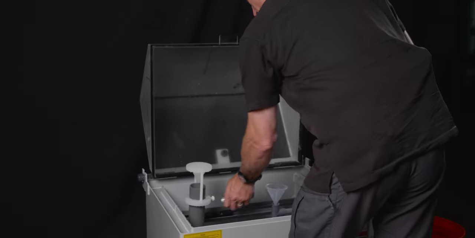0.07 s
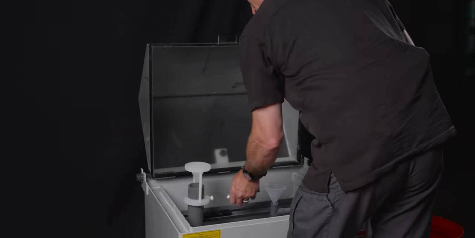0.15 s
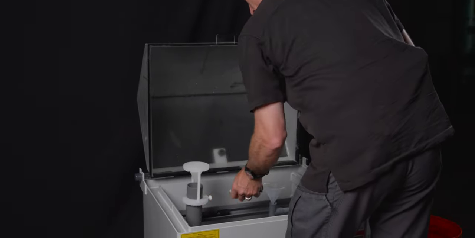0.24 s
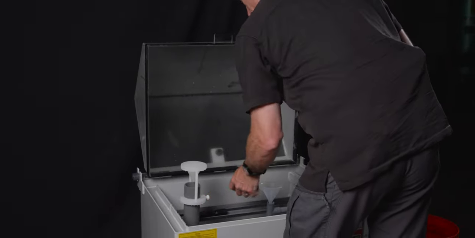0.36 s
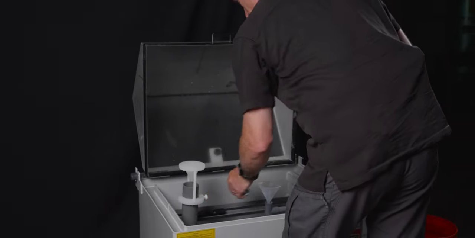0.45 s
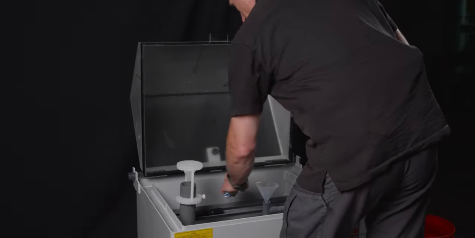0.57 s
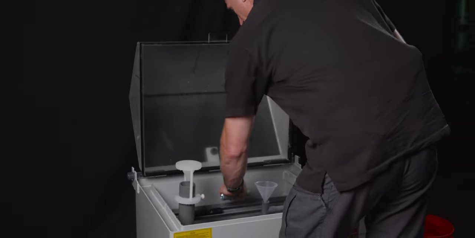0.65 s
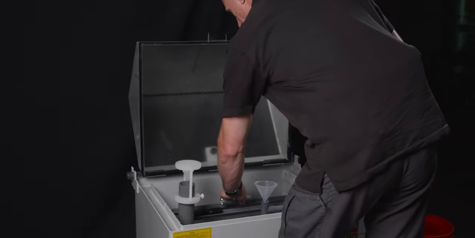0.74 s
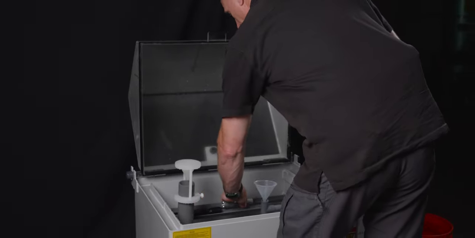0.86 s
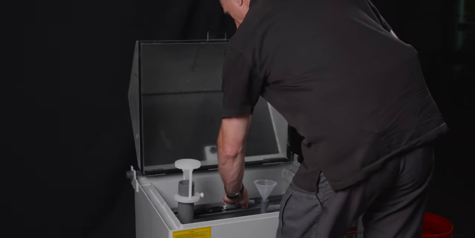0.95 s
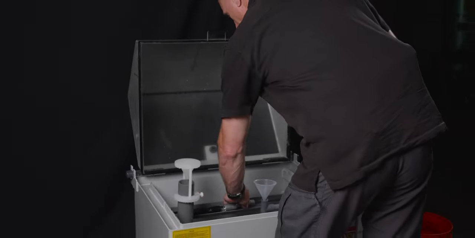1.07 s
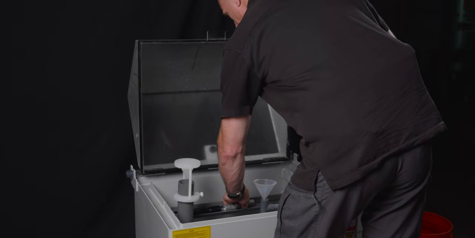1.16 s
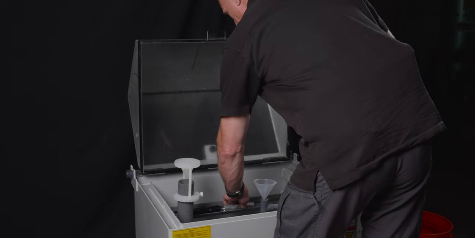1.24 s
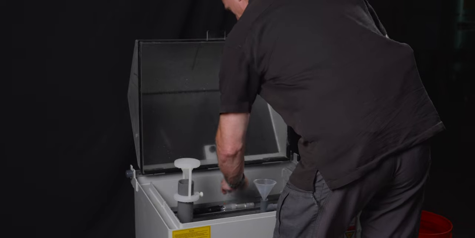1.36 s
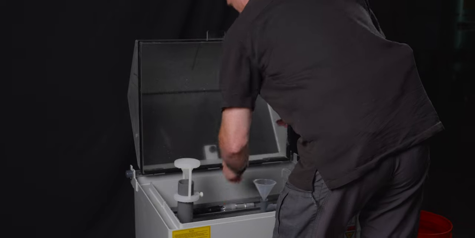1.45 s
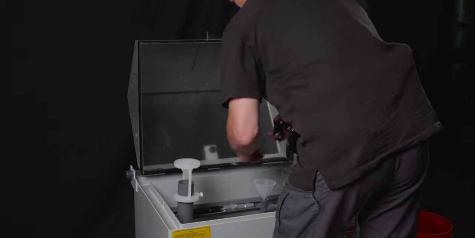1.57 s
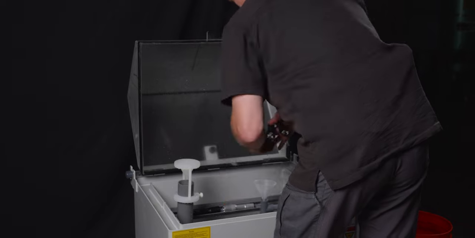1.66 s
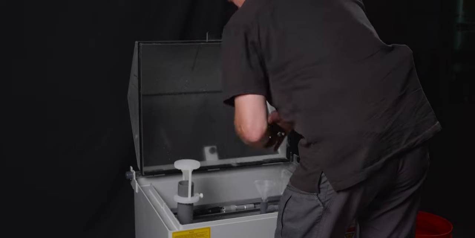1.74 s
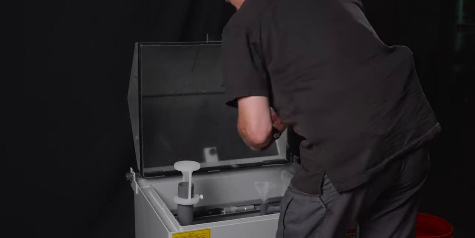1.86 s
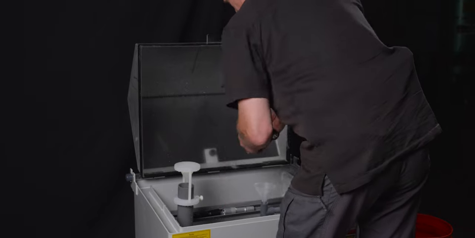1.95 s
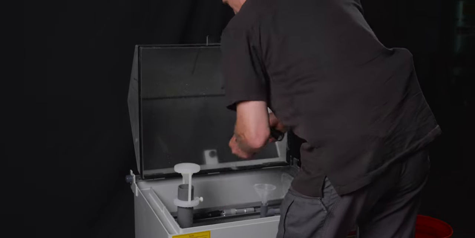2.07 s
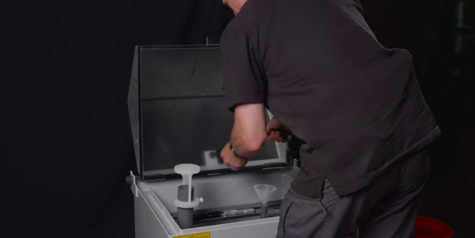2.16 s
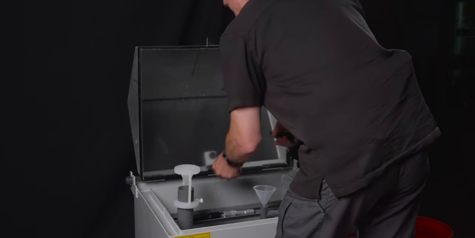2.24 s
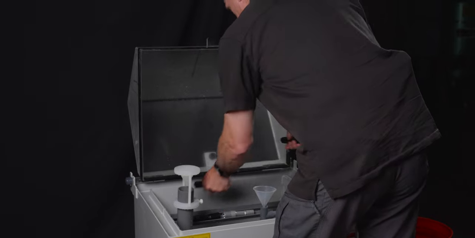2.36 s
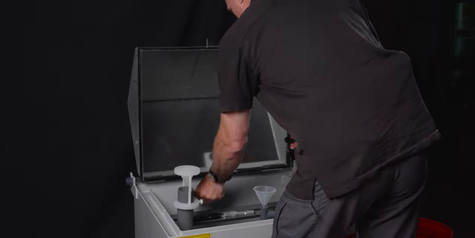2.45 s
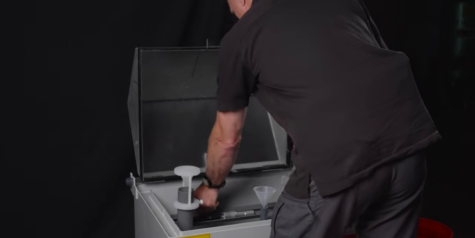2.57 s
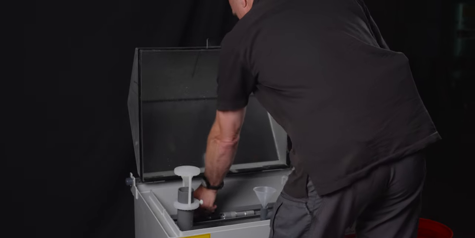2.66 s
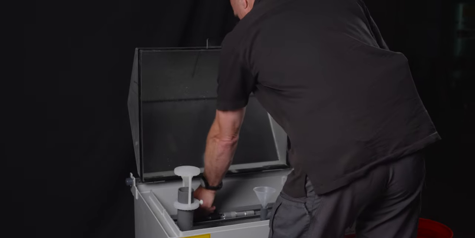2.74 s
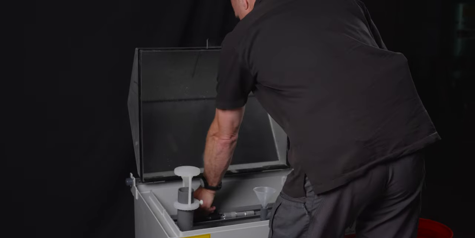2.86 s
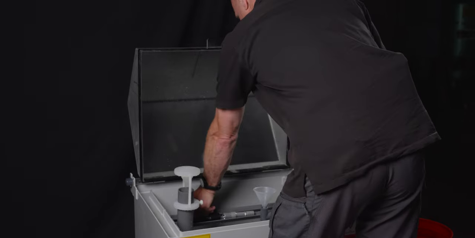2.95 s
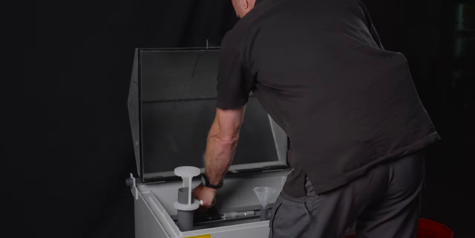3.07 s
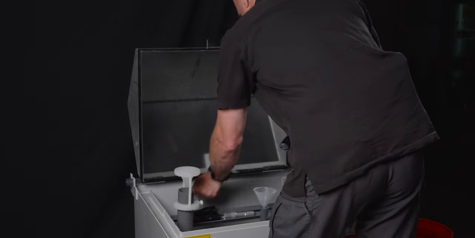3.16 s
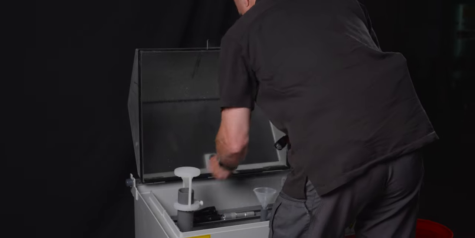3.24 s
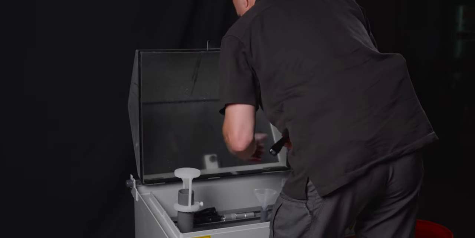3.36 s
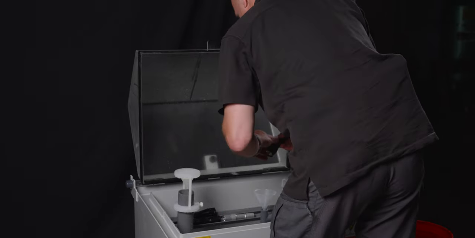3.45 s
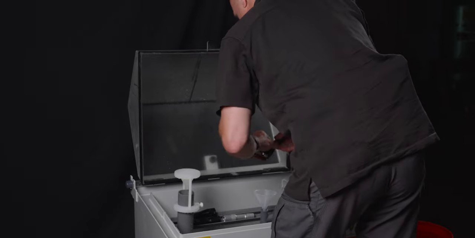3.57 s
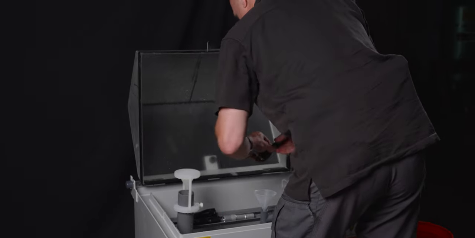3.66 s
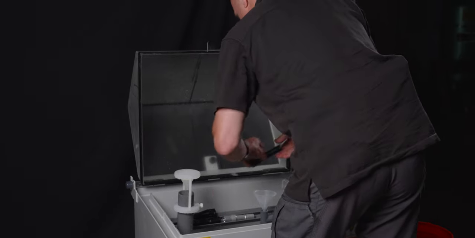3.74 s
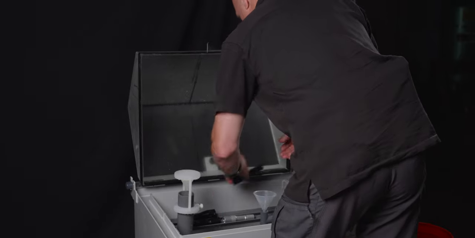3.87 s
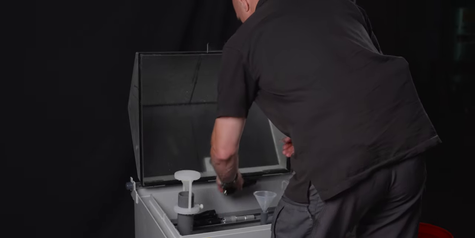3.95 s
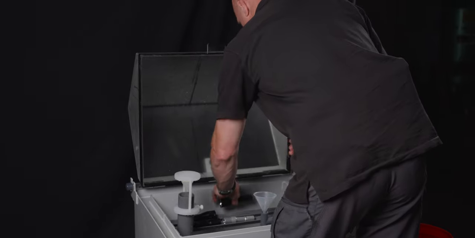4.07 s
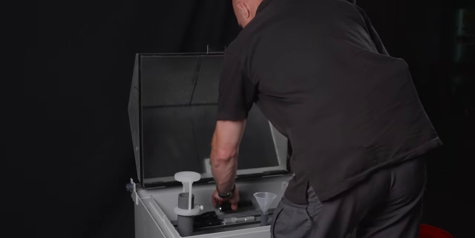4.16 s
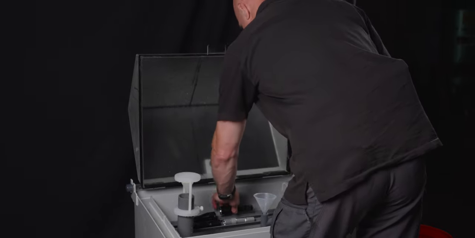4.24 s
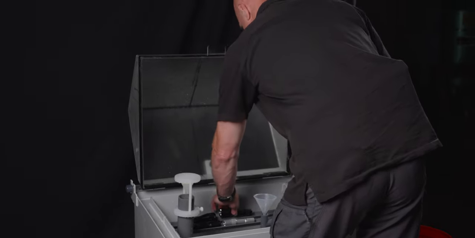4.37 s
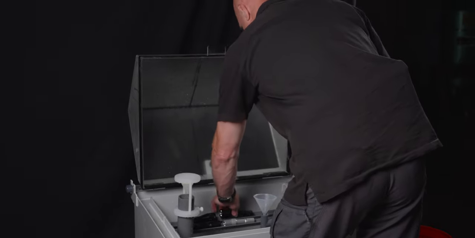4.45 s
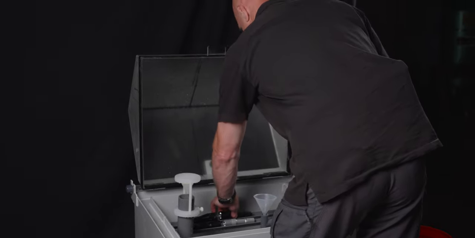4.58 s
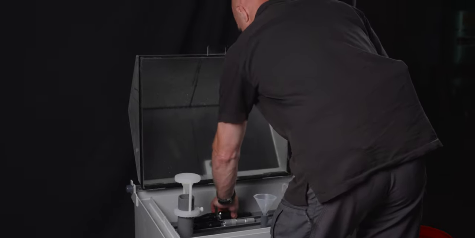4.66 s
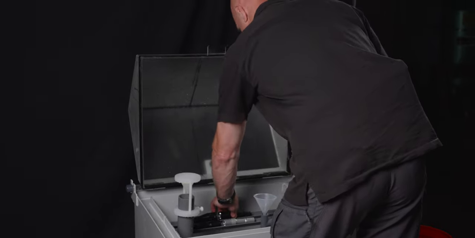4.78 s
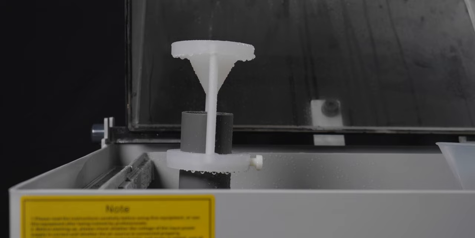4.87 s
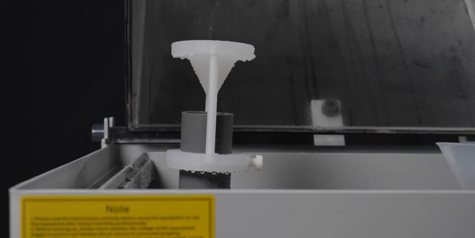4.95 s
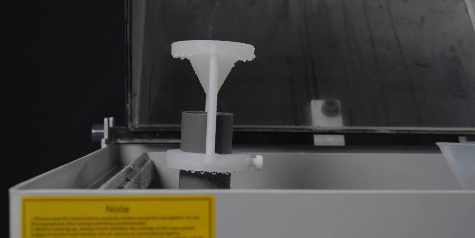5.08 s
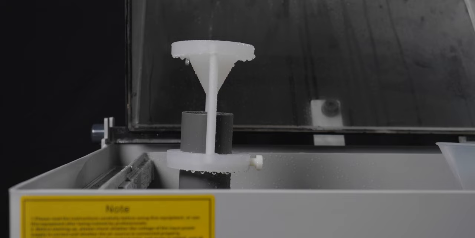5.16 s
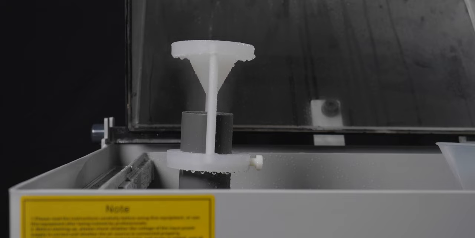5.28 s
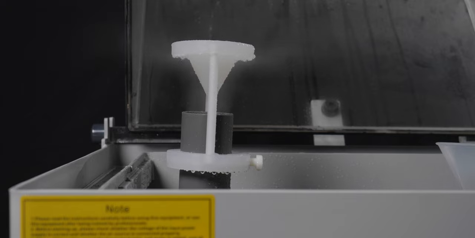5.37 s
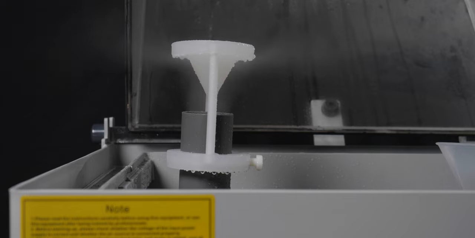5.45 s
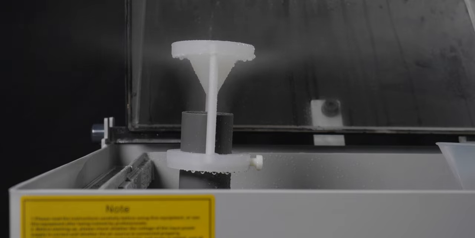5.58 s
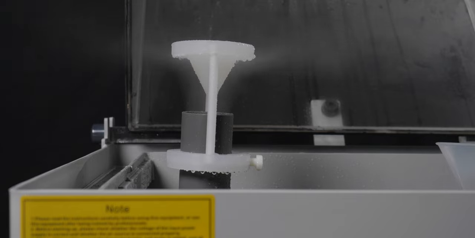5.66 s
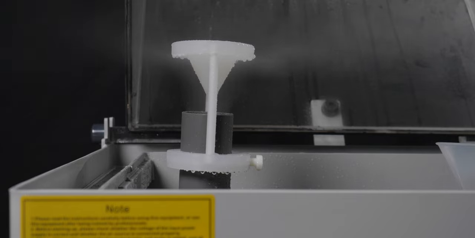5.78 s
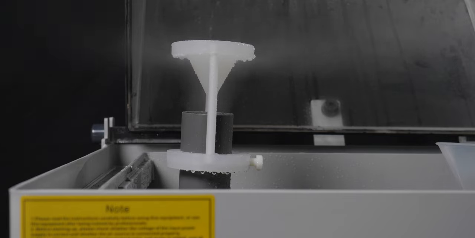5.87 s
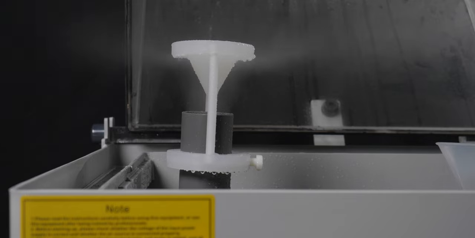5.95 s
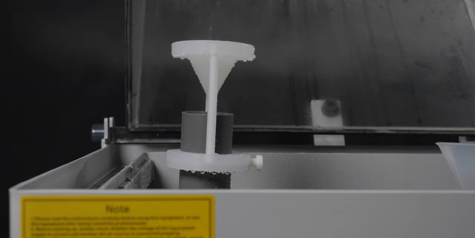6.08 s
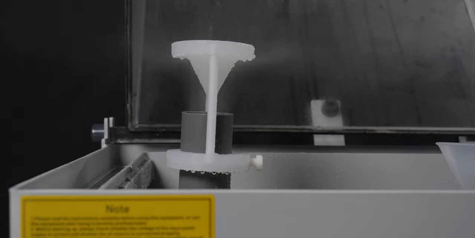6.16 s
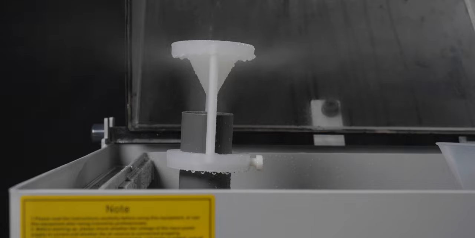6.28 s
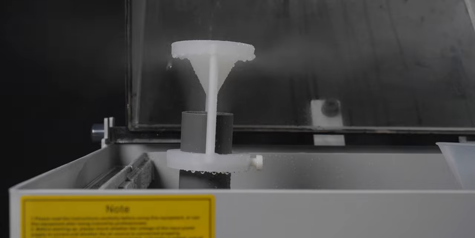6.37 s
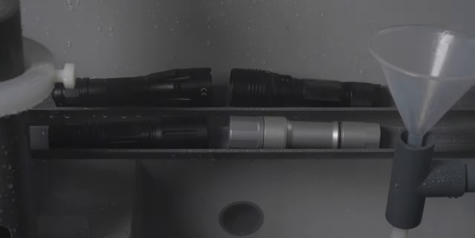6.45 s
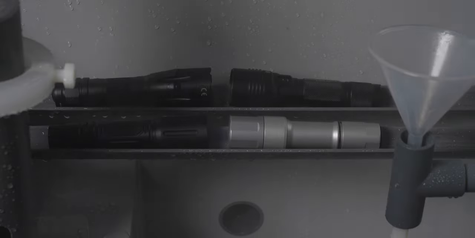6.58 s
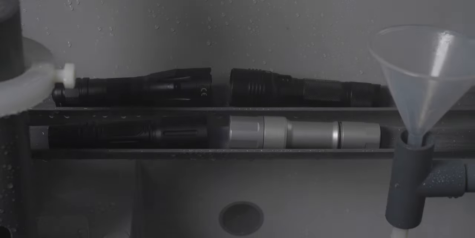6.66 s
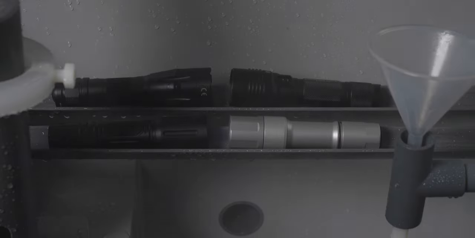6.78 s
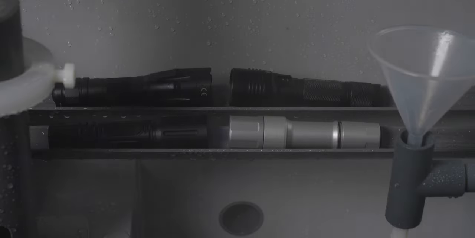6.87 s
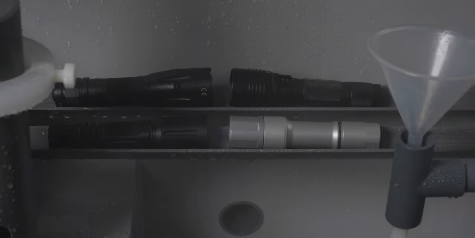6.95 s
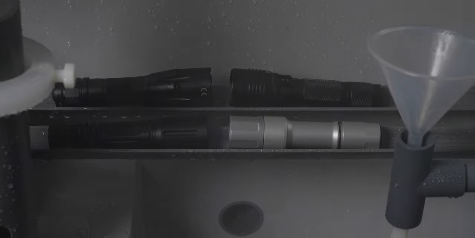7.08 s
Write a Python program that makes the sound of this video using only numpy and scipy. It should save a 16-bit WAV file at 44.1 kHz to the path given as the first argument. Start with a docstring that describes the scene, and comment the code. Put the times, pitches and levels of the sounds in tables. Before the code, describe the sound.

Sparse knocks and clicks of flashlights being set down in a tub, a brief hush, then a steady bright spray hiss, gurgling, and a late thud.

```python
"""Metal flashlights are laid on the plastic rack of an open salt spray chamber: struck modes over wall clatter.
Room, soft rustling, clicks and scrapes accompany them; motor tones and air noise make the workshop hum.
Then the atomiser starts: turbulent noise hisses, coloured by narrow resonances, droplets sizzle,
and gulps of brine ring the spray tower. Low thuds, strongest late on, are decaying lowpassed noise."""
import sys
import numpy as np
from scipy import signal
from scipy.io import wavfile
from scipy.ndimage import uniform_filter1d

SR = 44100
rng = np.random.default_rng(int(sys.argv[2]) if len(sys.argv) > 2 else 0)


def output_pcm(signal):
    """Save a mono or channel-first signal as 16-bit PCM at the path in sys.argv[1].

    Samples are clipped to [-1, 1] before scaling.
    """
    pcm = np.clip(np.atleast_2d(signal).T, -1, 1) * 32767
    wavfile.write(sys.argv[1], SR, np.round(pcm).astype(np.int16))


N = 313992
T = np.arange(N) / SR
SPRAY_STARTS_S = 4.917


def from_db(db):
    """Decibels to gain."""
    return 10 ** (np.asarray(db) / 20)


def rms_one(x):
    """Scale to unit power."""
    return x / np.sqrt(np.mean(x ** 2) + 1e-20)


def at_hz(points, hz):
    """Read a table on a log-frequency axis."""
    f, value = np.transpose(points)
    return np.interp(np.log(hz), np.log(f), value)


def butter(x, hz, kind, order=2):
    """Causal Butterworth filter."""
    sos = signal.butter(order, np.clip(hz, 10, .48 * SR), kind, fs=SR, output="sos")
    return signal.sosfilt(sos, x)


def noise_bands(spectrum, size):
    """Third-octave-wide noises that add up to unit power: (centres, bands)."""
    edges = np.geomspace(22, 17000, 29)
    centres = np.sqrt(edges[1:] * edges[:-1])
    # neighbouring bands draw on different noises; the first quarter second is filter settling
    white = rng.standard_normal((2, size + SR // 4))
    bands = []
    for k, hz in enumerate(centres):
        band = butter(white[k % 2], edges[k:k + 2], "band")[-size:]
        bands.append(from_db(at_hz(spectrum, hz)) * band)
    bands = np.array(bands)
    return centres, bands / bands.sum(0).std()


def noise(spectrum, size=N):
    """Coloured noise of unit power."""
    return noise_bands(spectrum, size)[1].sum(0)


def resonant_noise(modes, even_s):
    """Turbulence ringing in (Hz, width Hz, dB) resonances, its loudness evened over even_s."""
    out = 0
    for hz, width_hz, db in modes:
        ring = butter(rng.standard_normal(N), [hz - width_hz / 2, hz + width_hz / 2], "band", order=1)
        ring = butter(ring, [hz - 2 * width_hz, hz + 2 * width_hz], "band", order=1)
        out = out + from_db(db) * rms_one(ring)
    power = uniform_filter1d(out ** 2, max(int(even_s * SR), 2))
    return out / np.sqrt(power + 1e-9)


def dying(t, t60_s):
    """Exponential decay, 60 dB down after t60_s."""
    return np.exp(-np.log(1000) * t / t60_s)


def ramp(s, length_s):
    """Rises from 0 to 1, centred on time s."""
    return np.clip((T - s) / length_s + .5, 0, 1)


def swells(rows):
    """Power over time of bell-shaped (s, dB, half length s) bursts."""
    return sum(from_db(db) ** 2 * np.exp(-((T - s) / half_s) ** 2) for s, db, half_s in rows)


def add(out, s, sound):
    """Mix a sound in at time s."""
    i = int(s * SR)
    out[i:i + len(sound)] += sound[:N - i]


# steady motor tones: (frequency [Hz], relative level [dB])
HUM_TONES = [(75.4, -77), (118.4, -70.5), (166.9, -61), (355.3, -80), (414.5, -88.5)]
# higher motor tone that comes and goes: (start [s], end [s], level [dB])
WHINES = [(0.057, 0.488, -68), (2.307, 2.764, -69.5), (6.403, 6.667, -67.5)]
WHINE_HZ, WHINE_FADE_S = 452, 0.1
# still air: (frequency [Hz], relative density [dB per Hz])
AIR_COLOUR = [(25, -14), (45, -2.5), (68, 4), (95, -7), (140, 8), (200, -13), (250, 0.5), (380, 4),
              (550, -5.5), (850, -7), (1300, -18), (4000, -23.5), (9000, -28), (15500, -29)]


def workshop(air_db, hum_db, waver_rad):
    """Motor tones with slightly wavering phase over still air."""
    tones = [(hz, from_db(db + hum_db)) for hz, db in HUM_TONES]
    whine = 0
    for start_s, end_s, db in WHINES:
        whine = whine + from_db(db) * ramp(start_s, WHINE_FADE_S) * (1 - ramp(end_s, WHINE_FADE_S))
    hum = 0
    for hz, gain in tones + [(WHINE_HZ, whine)]:
        phase_rad = waver_rad * rms_one(butter(rng.standard_normal(N + SR), 8.5, "low")[SR:])
        hum = hum + gain * np.sqrt(2) * np.sin(2 * np.pi * hz * T + phase_rad)
    return hum + from_db(air_db) * noise(AIR_COLOUR)


# room decay: (frequency [Hz], t60 [s])
ROOM_T60 = [(100, 0.89), (500, 1), (1500, 1), (3200, 0.93), (6000, 0.71), (11000, 0.18), (16000, .3)]
# crowd of short-lived wall modes: (frequency [Hz], relative density [dB per Hz])
CLATTER_COLOUR = [(80, -22.5), (200, -4), (330, -15), (550, -2), (1100, -3), (1550, -7), (2100, -2.5),
                  (3200, 0.5), (4400, -2), (6800, -4.5), (10000, -14), (15500, -22.5)]


def room_tail(spectrum):
    """One second of diffuse sound dying band by band."""
    centres, bands = noise_bands(spectrum, SR)
    return (bands * dying(T[:SR], at_hz(ROOM_T60, centres)[:, None])).sum(0)


def earlier_knock(level_db, top_hz):
    """The room still rings from a flashlight put down a moment before."""
    out = np.zeros(N)
    add(out, 0, from_db(level_db) * butter(room_tail(CLATTER_COLOUR), top_hz, "low", order=1))
    return out


# soft rustling swells; the first is the ring of an earlier knock dying away:
# (peak time [s], level [dB], rise [s], release t60 [s], swish re rustle [dB])
RUSTLES = [(.02, -55.5, 0.057, 1.18, -12), (2.11, -71.5, 0.11, 1.1, -5), (2.55, -81, 0.22, 2.5, -1),
           (3.55, -70, .08, 3.2, -15.5), (3.87, -66.5, .025, 1.6, -33.5), (4.62, -67, 0.058, 0.78, -19.5),
           (4.85, -63, 0.029, 1.0, -13)]
# low part of the swells: (frequency [Hz], relative density [dB per Hz])
RUSTLE_COLOUR = [(150, -11), (400, 10), (800, 4), (1200, 3), (1600, -1.5), (2700, -8.5), (3400, -13),
                 (5500, -19), (8000, -36.5), (15000, -31.5)]
# airy swish: (frequency [Hz], relative density [dB per Hz])
SWISH_COLOUR = [(1500, -26), (2500, -4), (4000, 1.5), (5800, -2), (7500, -13), (15000, -30)]


def rustles():
    """Soft noise swells, each rising to a peak and dying away, with an airy swish on top."""
    out, rustle, swish = 0, noise(RUSTLE_COLOUR), noise(SWISH_COLOUR)
    for s, db, rise_s, t60_s, swish_db in RUSTLES:
        rise = np.exp(-(np.minimum(T - s, 0) / rise_s) ** 2)
        swell = rise * dying(np.maximum(T - s, 0), t60_s)
        out = out + from_db(db) * swell * (rustle + from_db(swish_db) * swish)
    return out


# clicks and chinks of metal in the hand: (time [s], level [dB], pitch [Hz], relative width [1], t60 [s])
TICKS = [(.526, -71, 4600, 0.23, .05), (.766, -63, 3000, 0.055, .06), (1.581, -33, 3420, 0.22, 0.022),
         (3.439, -46, 910, .15, 0.024)]


def ticks():
    """Short clicks of metal on metal: decaying narrow-band noise."""
    out, t = np.zeros(N), T[:SR // 5]
    for s, db, hz, width, t60_s in TICKS:
        click = butter(rng.standard_normal(len(t)), [hz / (1 + width), hz * (1 + width)], "band")
        add(out, s, from_db(db) * rms_one(click) * dying(t, t60_s))
    return out


# room response: (frequency [Hz], relative level [dB])
ROOM_COLOUR = [(100, 12.5), (500, 0), (1200, -1.5), (3000, -6), (6000, -4.5), (15000, -12.5)]


def room(x, build_s):
    """The workshop stores each band's energy and gives it back as smooth, diffuse sound."""
    out = 0
    centres, bands = noise_bands(ROOM_COLOUR, N)
    half_band = np.sqrt(centres[1] / centres[0])
    build = np.exp(-1 / (build_s * SR))
    for hz, band in zip(centres, bands):
        power = butter(x + 1e-18, [hz / half_band, hz * half_band], "band") ** 2
        keep = dying(1 / SR, at_hz(ROOM_T60, hz)) ** 2   # share of energy kept per sample
        stored = signal.lfilter([(1 - keep) * (1 - build)], [1, -keep - build, keep * build], power)
        out = out + from_db(at_hz(ROOM_COLOUR, hz)) * np.sqrt(np.abs(stored)) * rms_one(band)
    return out


def spot(x, hz, gain_db, width):
    """The touched part of the rack lifts a narrow band of its own."""
    return x + from_db(gain_db) * butter(x, [hz / (1 + width), hz * (1 + width)], "band", order=1)


# flashlight touches rack:
# (time [s], relative level [dB], contact brightness [Hz], clatter t60 at 2 kHz [s], spot resonance [Hz])
KNOCKS = [(1.053, -38.5, 6500, 0.085, 950), (1.175, -27, 1702, 0.084, 810), (1.257, -39, 3500, .06, 3420),
          (1.263, -20, 7300, 0.056, 2600), (1.285, -34, 6000, 0.11, 3000), (1.299, -31, 4500, .08, 1180),
          (2.716, -40.5, 4500, 0.046, 1790), (2.73, -36, 700, 0.08, 600), (2.794, -43, 6500, 0.068, 2760),
          (2.886, -28, 9000, 0.063, 3350), (2.906, -24.5, 7400, 0.071, 603),
          (3.438, -56.5, 2590, 0.037, 1000), (4.483, -38, 2450, 0.11, 2220), (4.619, -40, 2400, 0.2, 2160),
          (4.675, -30.5, 3000, 0.083, 423)]
# rack and tub modes: (frequency [Hz], mean relative level [dB], t60 [s])
RACK_MODES = [(236.8, -21.5, 0.39), (420.7, -15, 0.18), (591, -0.5, 0.053), (790, -12.5, .06),
              (1009, -14, 0.087), (1127, -13, 0.19), (1329, -7, 0.036), (1815, -5, .06),
              (2286, -0.5, 0.075), (2455, 1, 0.035), (2720, -1, 0.11), (3090, -3, 0.078), (3210, -5, 0.053),
              (3440, -11.5, .11), (4600, -18, 0.19), (5420, -5.5, 0.082), (5800, -15, .06),
              (7390, 0, 0.056)]
KNOCK_RISE_S = 0.0022   # time constant


def knocks(modes_db, clatter_db, scatter_db, damping):
    """Each touch rings the rack's modes over a clatter of wall modes whose treble dies first."""
    out, t = np.zeros(N), T[:SR // 2]
    hz, mode_db, mode_t60_s = np.transpose(RACK_MODES)[:, :, None]
    for s, db, bright_hz, t60_s, spot_hz in KNOCKS:
        centres, bands = noise_bands(CLATTER_COLOUR, len(t))
        band_t60_s = t60_s * (centres[:, None] / 2000) ** -damping
        clatter = (bands * dying(t, band_t60_s)).sum(0)
        # the point of contact sets each mode's strength and sign
        strength = from_db(mode_db + scatter_db * rng.standard_normal(hz.shape))
        strength = strength * rng.choice([-1, 1], hz.shape)
        ring = (strength * np.sin(2 * np.pi * hz * t) * dying(t, mode_t60_s)).sum(0)
        hit = from_db(clatter_db) * clatter + from_db(modes_db) * ring
        hit = hit * (1 - np.exp(-t / KNOCK_RISE_S))
        # softer contacts roll off the top
        hit = butter(hit, bright_hz, "low", order=1)
        hit = butter(hit, 2.7 * bright_hz, "low", order=1)
        add(out, s, from_db(db) * spot(hit, spot_hz, gain_db=2.5, width=0.043))
    return out


# low thuds: cabinet bumps, the rumble under a knock, and a bump's dying tail:
# (time [s], level [dB], top [Hz], t60 [s])
THUDS = [(2.118, -52.5, 72, 0.14), (2.91, -53, 110, 0.77), (6.766, -46, 600, 0.12),
         (6.790, -29, 1600, 0.12), (6.813, -34.5, 520, 0.23), (6.892, -43.5, 387, 0.85)]
# thud noise: (frequency [Hz], relative density [dB per Hz])
THUD_COLOUR = [(25, -24), (45, -14), (70, 1.5), (170, 2), (330, 4), (480, 3.5), (1000, 0), (2400, -9),
               (3500, -29), (9000, -37)]


def thuds(lowest_hz):
    """Lowpassed noise dying away, as of low panel modes; each thud has its own top and decay."""
    out, t = np.zeros(N), T[:SR]
    for s, db, top_hz, t60_s in THUDS:
        thud = rms_one(butter(noise(THUD_COLOUR, len(t)), top_hz, "low"))
        add(out, s, from_db(db) * thud * dying(t, t60_s))
    return butter(out, lowest_hz, "high")


# flashlight judders along a rack bar: (time [s], level [dB], half length [s])
SCRAPES = [(4.582, -50.5, 0.0064), (4.612, -48.5, 0.0073), (4.632, -44, 0.011), (4.69, -60, 0.064),
           (4.848, -57.5, 0.02)]
# rubbed rack bar: (frequency [Hz], width [Hz], relative level [dB])
SLIDE_MODES = [(2140, 180, 9), (2600, 990, 10), (3640, 140, -11), (1390, 600, -14), (600, 1000, -7),
               (295, 190, -1)]
# squeak as it is pushed home: (time [s], level [dB], half length [s]); (frequency [Hz], width [Hz], level [dB])
SQUEAK, SQUEAK_MODE = (4.85, -59.5, 0.024), (3660, 110, 0)


def scrapes():
    """Friction rings the rack bar in short judders and ends in a small squeak."""
    judders = np.sqrt(swells(SCRAPES)) * resonant_noise(SLIDE_MODES, even_s=0.0086)
    squeak = np.sqrt(swells([SQUEAK])) * resonant_noise([SQUEAK_MODE], even_s=0.0077)
    return judders + squeak


PRESSURE_START_DB, PRESSURE_BUILD_S = -16.5, 0.15   # build is a time constant
AT_RACK_S, EASING_DB_PER_S = 6.488, -4   # from here on heard from down at the rack


def pressure(at_rack_db):
    """Air supply strength as heard: it builds, holds, then is softer from down at the rack and eases off."""
    build_db = PRESSURE_START_DB * np.exp(-np.maximum(T - SPRAY_STARTS_S, 0) / PRESSURE_BUILD_S)
    easing_db = EASING_DB_PER_S * np.maximum(T - AT_RACK_S, 0)
    return from_db(build_db + at_rack_db * ramp(AT_RACK_S, 0.007) + easing_db)


# air jet hiss: (frequency [Hz], relative density [dB per Hz])
JET_COLOUR = [(50, -12), (110, -9), (220, 3), (320, -24), (550, 5.5), (1050, 2), (1500, 3), (2200, 2),
              (3200, 2), (4500, 4.5), (6500, 3), (9000, 6), (13000, 6), (16000, -3.5)]
# narrow resonances that colour the hiss: (frequency [Hz], width [Hz], relative level [dB])
HISS_MODES = [(1813, 36, 5), (2586, 6, -2), (2875, 21, 0.5), (3190, 15, 1), (3463, 10.5, 1.5),
              (4760, 16, 2.5), (5630, 35, -17), (5880, 10, 5), (6160, 120, -24), (7940, 25, 9.5),
              (8400, 66, 1), (10330, 640, 1)]
# droplet sizzle: (frequency [Hz], width [Hz], relative level [dB])
SIZZLE_MODES = [(6300, 650, 3.5), (6270, 150, -2), (6880, 250, -2), (7660, 320, 0.5), (3440, 390, -4.5)]
# spits of brine tearing into droplets: (time [s], relative level [dB], half length [s])
SPITS = [(5.302, -37, 0.0079), (5.335, -40, 0.0048), (5.392, -33.5, .013), (5.48, -31.5, .013),
         (5.853, -36.5, 0.0096), (5.928, -35, 0.01), (6.13, -42, 0.0046), (6.165, -35.5, 0.0042),
         (6.2, -34.5, 0.0085), (6.26, -45, .012)]
BRINE_ARRIVES_S, WETTING_S, DRY_JET_DB = 5.29, 0.0099, -2.5   # the jet is weaker until brine arrives
CHOKE_S, CHOKE_HALF_S, CHOKE_DEPTH = 6.093, 0.037, .45   # the jet falters once
RACK_JET_DB = -3
RACK_SHADE, RACK_SHADE_HZ = 0.18, (10700, 13900)   # share of the top lost at the rack, and its band


def spray(jet_db, modes_db, sizzle_db, spit_db):
    """A smooth air jet follows the pressure; once wet it grows louder and droplets sizzle in it."""
    wet = ramp(BRINE_ARRIVES_S, WETTING_S)
    choke = 1 - CHOKE_DEPTH * np.exp(-((T - CHOKE_S) / CHOKE_HALF_S) ** 2)
    air = pressure(RACK_JET_DB) * from_db(DRY_JET_DB * (1 - wet)) * choke
    colouring = resonant_noise(HISS_MODES, even_s=0.11)
    jet = air * (from_db(jet_db) * noise(JET_COLOUR) + from_db(modes_db) * colouring)
    sizzle_power = (from_db(sizzle_db) * air * wet) ** 2
    spit_power = from_db(spit_db) ** 2 * swells(SPITS)
    droplets = np.sqrt(sizzle_power + spit_power) * resonant_noise(SIZZLE_MODES, even_s=0.021)
    hiss = jet + droplets
    shaded = butter(hiss, RACK_SHADE_HZ, "band", order=1)
    return hiss - RACK_SHADE * ramp(AT_RACK_S, .01) * shaded


# gulps of brine, about twelve a second: (time [s], relative level [dB], half length [s])
GULPS = [(5.348, -26, 0.01), (5.45, -25, 0.017), (5.531, -26.5, 0.022), (5.606, -32.5, 0.015),
         (5.686, -26, 0.01), (5.77, -28, 0.014), (5.835, -25, 0.022), (5.903, -24.5, 0.02),
         (5.975, -27, 0.02), (6.058, -28, 0.023), (6.165, -31, 0.03), (6.269, -30, 0.013)]
# air column of the spray tower: (frequency [Hz], width before blur [Hz], relative level [dB])
TOWER_MODES = [(698.4, 8.86, 2), (730.8, 14.7, -7.5), (808, 9.2, -9.5), (887.7, 11.7, -12), (585, 69, -22),
               (427, 14, -24), (1310, 44, -11.5), (1197, 16, -22), (1785, 91, -21), (2260, 17, -21)]
RACK_TOWER_DB = -5.5   # before flow_power


def tower_ring(even_s):
    """Driven hard, each mode of the air column sings steadily, with a wandering phase."""
    ring = 0
    for hz, width_hz, db in TOWER_MODES:
        ring = ring + from_db(db) * resonant_noise([(hz, width_hz, 0)], even_s)
    return rms_one(ring)


def tower(gulp_db, flow_db, gulp_top_hz, flow_top_hz, flow_power, blur):
    """Gulps make the low modes sing; even flow, growing with pressure, only stirs them into a hollow rush."""
    ring = butter(tower_ring(even_s=0.014), gulp_top_hz, "low", order=1)
    singing = np.sqrt(swells(GULPS)) * ring
    blurred_modes = [(hz, blur * width_hz, db) for hz, width_hz, db in TOWER_MODES]
    stirred = resonant_noise(blurred_modes, even_s=0.047)
    rush = pressure(RACK_TOWER_DB) ** flow_power * butter(stirred, flow_top_hz, "low", order=1)
    return from_db(gulp_db) * singing + from_db(flow_db) * rush


# reservoir air pockets: (frequency [Hz], width [Hz], relative level [dB])
BURP_MODES = [(182, 20.7, 3), (225, 9.5, -5.5), (355, 130, -6)]


def reservoir(steady_db, gulp_db, settle_t60_s):
    """Air pockets burble in the reservoir from the moment the valve opens, and again with each gulp."""
    burble = from_db(steady_db) * dying(np.maximum(T - SPRAY_STARTS_S, 0), settle_t60_s)
    power = burble ** 2 + from_db(gulp_db) ** 2 * swells(GULPS)
    return np.sqrt(power) * resonant_noise(BURP_MODES, even_s=0.07)


LOADING_ENDS_S = 4.861


def scene():
    """Loading, a brief hush, then spraying."""
    loading = np.interp(T, [LOADING_ENDS_S, LOADING_ENDS_S + 0.0062], [1, 0])
    opening_s = [LOADING_ENDS_S + 0.0026, SPRAY_STARTS_S - .008, SPRAY_STARTS_S + 0.0017]
    spraying = np.interp(T, opening_s, [0, .12, 1])

    contacts = knocks(modes_db=-10.5, clatter_db=4.5, scatter_db=4.5, damping=0.058)
    contacts = contacts + ticks() + scrapes()
    handling = contacts + from_db(-10.5) * room(contacts, build_s=.005)
    handling = handling + rustles() + earlier_knock(level_db=-53.5, top_hz=1880)

    mist = spray(jet_db=-40.5, modes_db=-50.0, sizzle_db=-46, spit_db=-2.5)
    mist = mist + tower(gulp_db=-3.0, flow_db=-41, gulp_top_hz=1260, flow_top_hz=2500,
                        flow_power=1.39, blur=1.18)
    mist = mist + reservoir(steady_db=-57.5, gulp_db=-27.5, settle_t60_s=8.5)

    # the motor is louder close to the running chamber
    nearness = np.maximum(loading + from_db(2.5) * spraying, from_db(-27))
    background = workshop(air_db=-68.5, hum_db=-2.0, waver_rad=0.092) * nearness
    return (loading * handling + spraying * mist + thuds(lowest_hz=50) + background)[None]


CUTOFF_HZ = 15900


def record(dry):
    """The top is cut steeply by an elliptic lowpass."""
    return signal.sosfilt(signal.ellip(12, .1, 70, CUTOFF_HZ, fs=SR, output="sos"), dry)


dry = scene()
out = record(dry)
output_pcm(out)
```